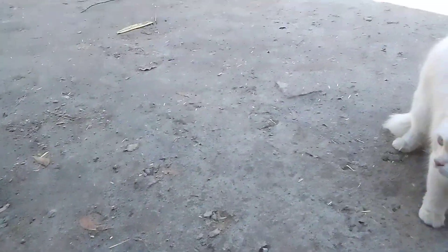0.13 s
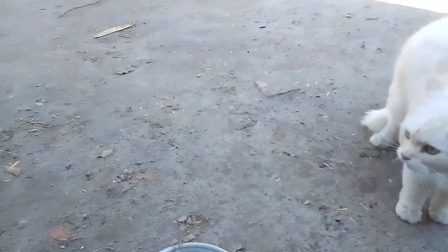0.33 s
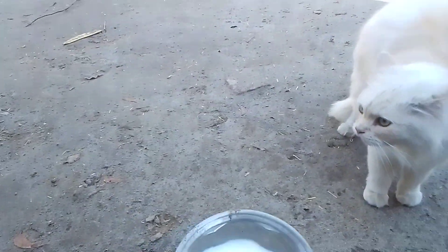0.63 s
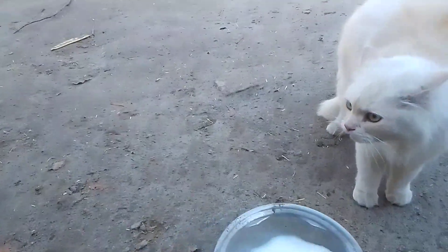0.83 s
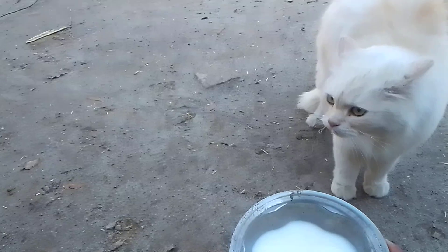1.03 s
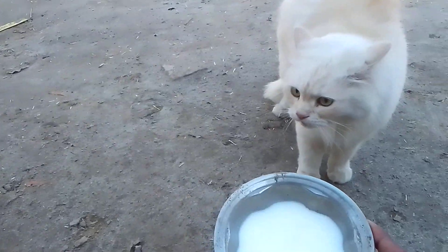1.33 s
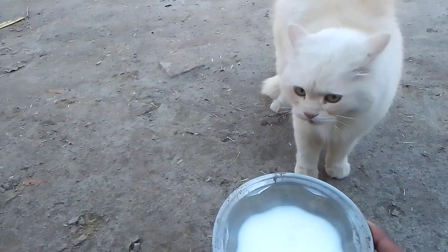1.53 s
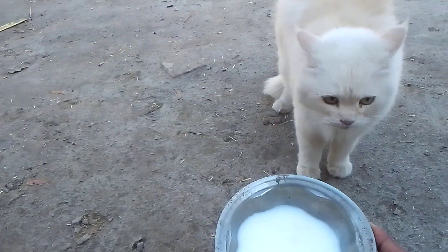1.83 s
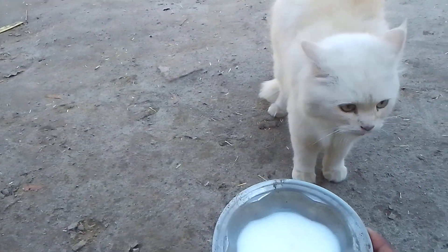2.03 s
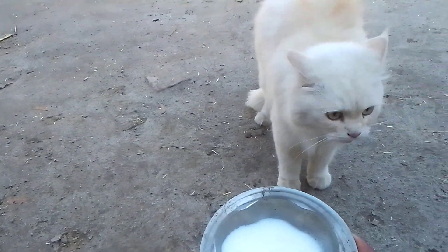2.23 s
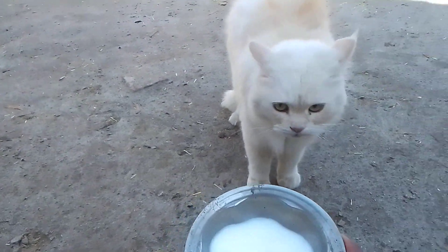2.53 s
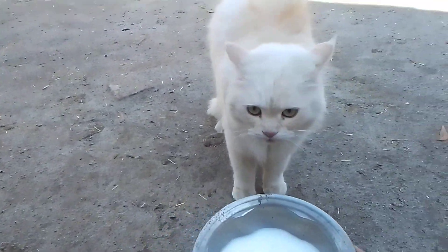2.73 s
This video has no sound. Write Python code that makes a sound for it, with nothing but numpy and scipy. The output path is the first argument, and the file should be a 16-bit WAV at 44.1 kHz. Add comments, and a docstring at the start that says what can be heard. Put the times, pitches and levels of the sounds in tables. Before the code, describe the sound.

Close, nearly dry mono pickup in a quiet yard: one long cat yowl rises from a hum to a gravelly cry, tightens, wavers and falls away, with faint ticks and a small rasp near the end.

```python
"""Open ground, quiet outdoor air: a cat close by gives one long yowl, from closed-mouth hum to wide cry
whose vocal folds beat strong and weak in turn, then narrowing, quavering and sinking to a nasal moan.
The voice is a sum of harmonics and half-harmonics shaped by a changing throat, plus pulsed noise.
Harmonic sums also make a few faint second tones and a short rasp that breaks into noise; ticks are
decaying bands of noise. A weak, short scatter follows the near sounds; shaped noise is the air."""
import sys
import numpy as np
from scipy import signal
from scipy.fft import rfft, irfft, next_fast_len
from scipy.io import wavfile
from scipy.ndimage import map_coordinates

SR = 44100
rng = np.random.default_rng(int(sys.argv[2]) if len(sys.argv) > 2 else 0)


def put_to_file(sound):
    """Save the sound as 16-bit audio at rate SR, in the file named by the first command-line argument."""
    columns = np.atleast_2d(sound).T  # one column per channel
    safe = np.clip(columns, -1, 1)
    whole_steps = np.round(safe * 32767)
    wavfile.write(sys.argv[1], SR, whole_steps.astype(np.int16))


N = 127890

# Background air spectrum: (frequency [Hz], relative level [dB])
AIR_SPECTRUM = [(25, -6), (60, -23.5), (150, -34), (200, -15), (250, -39), (330, -4.5), (450, 7), (600, -9),
                (1700, -10.5), (3000, -13), (4600, -13), (5500, -24), (15500, -29)]
# Background air: (time [s], level [dB])
AIR_LEVEL = [(0, -71), (.25, -70), (2.1, -68), (2.5, -71), (2.9, -66)]

# Mean beat rate of the vocal folds: (time [s], pitch [Hz])
PITCH = [(0.0, 395.4), (0.28, 373.3), (0.35, 374), (0.39, 380), (0.41, 388), (0.428, 382), (0.45, 392),
         (0.47, 385), (0.5, 396), (0.53, 399.2), (0.64, 406), (0.84, 432.3), (1.07, 431.5), (1.12, 442.3),
         (1.45, 444.6), (1.68, 454.5), (1.72, 463.2), (1.76, 453.6), (1.92, 465.8), (2.04, 454.0),
         (2.06, 439), (2.085, 462.0), (2.11, 435), (2.15, 451), (2.18, 422.3), (2.197, 452), (2.24, 450),
         (2.255, 437), (2.28, 438), (2.295, 409.3), (2.385, 413.1), (2.41, 391.1), (2.48, 396), (2.53, 383),
         (2.62, 346.4), (2.71, 331.6), (2.76, 337.7), (2.845, 316.1), (2.86, 335.2), (2.9, 329.8)]
# Voice level before shimmer: (time [s], level [dB])
EFFORT = [(0, -58.5), (.19, -56.5), (.26, -50.5), (.3, -44), (.44, -44), (.47, -42.5), (.5, -44.5),
          (.55, -43.5), (.62, -42.5), (.7, -39.5), (.86, -40.5), (1.08, -42.5), (1.44, -42), (1.63, -40.3),
          (1.85, -43), (2.1, -49.5), (2.26, -50.5), (2.33, -53), (2.43, -53), (2.52, -55), (2.9, -57.5)]
# Mouth: (time [s], shape [0 closed, 1 opening, 2 wide, 3 narrowed, 4 pursed, 5 nasal])
MOUTH = [(0, 0), (.17, .05), (.24, .55), (.29, 1), (.38, 1.05), (.55, 1.8), (.68, 2), (.9, 2), (1.04, 2.45),
         (1.14, 2.9), (1.4, 3), (1.8, 3), (2.07, 4), (2.27, 4.1), (2.3, 4.7), (2.45, 4.9), (2.6, 5),
         (2.9, 5)]
# Half-harmonics from alternating strong and weak beats: (time [s], gain [dB])
DOUBLING = [(0, -54), (.3, -22.5), (.38, -12.5), (.44, -10.5), (.62, -0.5), (.88, -6), (1.1, 0.5),
            (1.33, -4.5), (1.47, -11), (1.53, -7.5), (1.58, -1), (1.64, -8), (1.72, -28.5), (1.86, -28),
            (1.93, -28), (2.2, -29), (2.32, -29), (2.9, -25.5)]
# Fundamental against the throat's own response: (time [s], gain [dB])
CHEST = [(0, 1), (.2, -1.5), (.4, -1.5), (.5, 1.5), (1.1, 4), (1.7, -6), (2.1, 8), (2.4, 2), (2.75, -1)]
# Scale of the pitch unsteadiness: (time [s], scale [%])
QUAVER = [(0, .4), (.33, .2), (.44, .8), (.65, .38), (1.5, .45), (1.85, .55), (2.24, 1.25), (2.32, .5),
          (2.9, .8)]
# Hoarse noise against the voice: (time [s], level [dB])
HOARSE = [(.3, -28), (.43, -18), (.68, -23), (1.4, -30), (1.6, -24), (1.8, -31), (2.2, -27), (2.35, -32)]
# Throat response for each mouth shape: (frequency [Hz], gain [dB])
CLOSED = [(200, -35.5), (390, 1.5), (780, -5), (1170, -14), (1950, -31.5), (2600, -57), (3100, -20.5),
          (3950, -21), (4300, -24), (5000, -58), (6100, -36.5), (7500, -37), (15000, -51)]
OPENING = [(200, -46), (375, -15.5), (560, -21), (730, 8), (790, -5.5), (1130, -4), (1500, -18.5),
           (1880, -22), (2000, -26), (2130, -4), (2250, -2), (2420, -32.5), (2630, -20.5), (3000, -30),
           (3350, -44), (3750, -26.5), (4120, -25.5), (5600, -57), (6000, -28), (6350, -32), (6800, -58),
           (7500, -33), (8800, -69)]
WIDE = [(200, -45), (400, -17), (620, -27), (790, 0), (870, 0), (1050, -8), (1260, -5.5), (1480, -28),
        (1660, -24.5), (1900, -24), (2130, -23), (2330, -11), (2400, -9), (2490, -13), (2700, -23),
        (3400, -26), (3750, -42), (4100, -41), (5000, -51), (5450, -47), (6450, -46), (6900, -58),
        (7600, -46), (8800, -60), (15000, -54)]
NARROW = [(200, -61), (440, -16), (660, -27.5), (860, 2.5), (940, 2), (1110, -16), (1340, -20.5),
          (1560, -29), (1800, -26), (2000, -22.5), (2250, -13.5), (2460, -22.5), (2900, -31), (3170, -23.5),
          (3350, -23.5), (3600, -44), (4150, -33), (4600, -63), (5600, -56), (6100, -44.5), (7150, -57),
          (8800, -70.5), (15000, -56.5)]
PURSED = [(200, -21), (440, -14.5), (660, -7.5), (840, 0.5), (930, 7.5), (1330, -14.5), (1780, -20),
          (2130, -19), (2300, -8.5), (2700, -32), (3150, -37), (4100, -40), (4700, -47.5), (15000, -64)]
NASAL = [(200, -20), (300, 0), (960, 0), (1220, -2), (1380, -19), (1650, -26), (2020, -8), (2400, -33),
         (2850, -22), (3150, -30), (4150, -33), (4520, -21), (4900, -24), (5400, -46), (6400, -38),
         (7500, -50), (15000, -56)]
# Moving upper resonance of the mouth: (time [s], centre [Hz], height [dB])
RING = [(.38, 4050, 0), (.515, 4110, 24), (.58, 4050, 16), (.69, 4040, 30), (.77, 4100, 11),
        (.835, 4110, 19), (.865, 4300, 8), (.885, 4540, 21), (.95, 4540, 21), (1.03, 4470, 12),
        (1.14, 4240, 17), (1.44, 4200, 23), (1.6, 4130, 14), (2.03, 4130, 14), (2.3, 4100, 0)]
# Middle resonance of the mouth, the twang of the cry: (time [s], height [dB])
TWANG = [(.26, 2.5), (.36, -0.5), (.5, -0.5), (.88, 4), (1.1, -1), (1.67, -3), (1.715, 6.5), (1.75, -10),
         (1.86, 2.5), (2.4, -2.5)]
# High, thin resonance of the mouth: (time [s], height [dB])
WHISTLE = [(.3, 3), (.5, 8.5), (.6, 12.5), (.66, 20.5), (.7, 15), (.78, 23.5), (.86, -1.5), (1.05, -7.5),
           (1.15, 9), (1.45, 27), (1.58, 21.5), (1.9, 20.5), (2.05, 30), (2.2, 2)]

# Ticks: (time [s], starting level before the final halving [dB], centre [Hz])
TICKS = [(.452, -57, 4300), (1.308, -64, 6500), (2.608, -58, 2800), (2.613, -60, 4000)]
# Second tones beside the moan:
# (time [s], length [s], pitch [Hz], glide [Hz/s], level [dB], added level of second harmonic [dB])
SECOND_TONES = [(2.11, .11, 372, -380, -64.5, 10), (2.454, .13, 359.7, -330, -64.5, 8),
                (2.777, .16, 405.3, -2, -63, -12)]
# Throat of the second tones: (frequency [Hz], gain [dB])
SECOND_TONE_BODY = [(400, -0.5), (800, 0.5), (1200, -33), (2000, -20), (2420, -18), (2830, -13)]
# Resonances of the rasp at its starting pitch: (frequency [Hz], gain [dB])
RASP_BODY = [(500, -20), (1100, -31), (1500, 0), (1750, -4), (2040, 9), (2300, -6), (2500, 4.5),
             (2850, -26), (4000, -34), (4500, -20), (5000, -45)]
# Power of the rasp that breaks into coarse noise: (time [s], share [0 to 1])
RASP_BREAK = [(2.6, .15), (2.68, .2), (2.73, .7), (2.77, .7), (2.82, .3)]
# Coarse part of the rasp: (frequency [Hz], relative level [dB per Hz])
RASP_GRIT = [(1000, -35), (1500, -20), (1700, 3), (1950, 8.5), (2350, -3), (2700, -42), (5000, -36)]

RING_WIDTH_HZ = 175
TWANG_HZ, TWANG_WIDTH_HZ = 2330, 150
WHISTLE_HZ, WHISTLE_WIDTH_HZ = 6040, 130
JITTER_PER_S = 75
CYCLE_JITTER, CYCLE_JITTER_PER_S = 0.62, 260  # share of the quaver, changes a second
SHIMMER_DB, SHIMMER_PER_S = .6, 130
DRIFT_DB, DRIFT_PER_S = 1.02, 9.204  # slow drift of each upper partial
FLUTTER_DB, FLUTTER_PER_S = 2.1, 80  # fast flutter, dB for each % of quaver
SMEAR_RAD, SMEAR_PER_S = .95, 6  # upper partials wander out of step, which blurs each pulse
HOARSE_COLOUR = .62  # share of the throat's dB shape that the noise takes on
YARD_T60_S, YARD_DB = .3, -19
TICK_T60_S, TICK_WIDTH_SHARE = .018, .22
SECOND_TONE_FADE_S = 0.067
RASP_S, RASP_ATTACK_S, RASP_HOLD_S, RASP_RELEASE_S = 2.606, .006, .12, .14
RASP_HZ, RASP_SAG_HZ_PER_S = 512, 210
RASP_DB, RASP_RATTLE_DB, RASP_RATTLE_PER_S = -62, 2.3, 190
TOP_HZ = 15800


def amp(db):
    """Decibel law: level to amplitude ratio."""
    return 10 ** (np.asarray(db) / 20)


def unit(x):
    """Power normalisation: scale to rms 1."""
    return x / np.sqrt(np.mean(x ** 2) + 1e-20)


def along(points, hz):
    """Logarithmic frequency scale: interpolate (Hz, value) points."""
    f, v = np.transpose(points)
    return np.interp(np.log(hz + 1), np.log(f + 1), v)


def curve(rows):
    """Linear interpolation in time: one value per sample from (s, value) rows."""
    return np.interp(np.arange(N) / SR, *np.transpose(rows))


def wobble(rate):
    """Band-limited random fluctuation: a smooth curve through rate random knots a second."""
    coarse = np.arange(0, N + 16, 16)
    knots = rng.standard_normal(4096)
    values = map_coordinates(knots, [coarse * rate / SR], mode="wrap")
    return np.interp(np.arange(N), coarse, values)


def filtered(x, response):
    """Linear filtering: multiply the spectrum by a response of frequency."""
    m = next_fast_len(N + SR // 4)
    return irfft(rfft(x, m) * response(np.fft.rfftfreq(m, 1 / SR)), m)[:N]


def noise(spectrum):
    """Spectral shaping: coloured random noise of rms 1."""
    return unit(filtered(rng.standard_normal(N), lambda hz: amp(along(spectrum, hz))))


def bell(hz, centre_hz, width_hz):
    """Lorentzian resonance: a peak of 1 at its centre."""
    return 1 / (1 + ((hz - centre_hz) / width_hz) ** 2)


def causal(spectrum, size=4096):
    """Minimum phase: a ringing body's log gain and phase, on an even grid up to SR / 2."""
    log_gain = np.log(amp(along(spectrum, np.fft.rfftfreq(size, 1 / SR))))
    cepstrum = irfft(log_gain)
    # fold the cepstrum onto positive time
    cepstrum[1:size // 2] *= 2
    cepstrum[size // 2 + 1:] = 0
    return rfft(cepstrum)


def outdoor_air():
    """Broadband noise: a steady spectrum under a slowly changing level."""
    return amp(curve(AIR_LEVEL)) * noise(AIR_SPECTRUM)


def hoarseness(shapes, mouth, phase):
    """Turbulence modulated by the folds: throat-coloured noise that swells once a cycle."""
    hiss = np.zeros(N)
    for i, shape in enumerate(shapes):
        share = np.clip(1 - abs(mouth - i), 0, 1)
        hiss += share * noise([(hz, db * HOARSE_COLOUR) for hz, db in shape])
    pulsed = hiss * (1 + 0.33 * np.cos(phase))
    # little noise lies below the fundamental
    return unit(filtered(pulsed, lambda hz: amp(along([(240, -43), (330, 7)], hz))))


def yowl(count=38):
    """Source-filter principle with period doubling: fold (half-)harmonics pass a changing throat."""
    shapes = [CLOSED, OPENING, WIDE, NARROW, PURSED, NASAL]
    throat = np.array([causal(shape) for shape in shapes])
    mouth = np.clip(curve(MOUTH), 0, len(shapes) - 1)
    doubling = amp(curve(DOUBLING))
    quaver = curve(QUAVER)
    unsteadiness = wobble(JITTER_PER_S) + CYCLE_JITTER * wobble(CYCLE_JITTER_PER_S)
    pitch = curve(PITCH) * (1 + quaver / 100 * unsteadiness)
    phase = 2 * np.pi * np.cumsum(pitch) / SR
    ring_hz = curve([(s, hz) for s, hz, db in RING])
    ring_db = curve([(s, db) for s, hz, db in RING])
    twang_db, whistle_db = curve(TWANG), curve(WHISTLE)
    voice, power = np.zeros(N), np.zeros(N)
    for k in np.arange(1, count + 1) / 2:
        hz = k * pitch
        # blend neighbouring mouth shapes at this partial's frequency
        at = [mouth, hz / (SR / 2) * (throat.shape[1] - 1)]
        gain = np.exp(map_coordinates(throat.real, at, order=1))
        lag = map_coordinates(throat.imag, at, order=1)
        peaks_db = ring_db * bell(hz, ring_hz, RING_WIDTH_HZ)
        peaks_db += whistle_db * bell(hz, WHISTLE_HZ, WHISTLE_WIDTH_HZ)
        peaks_db += twang_db * bell(hz, TWANG_HZ, TWANG_WIDTH_HZ)
        gain *= amp(peaks_db)
        if k % 1:  # halfway between harmonics
            gain *= doubling
        if k == 1:
            gain *= amp(curve(CHEST))
        if k > 2:
            drift_db = DRIFT_DB * wobble(DRIFT_PER_S)
            gain *= amp(drift_db + FLUTTER_DB * quaver * wobble(FLUTTER_PER_S))
        if k > 3:
            lag += SMEAR_RAD * wobble(SMEAR_PER_S)
        voice += gain * np.cos(k * phase + lag)
        power += gain ** 2 / 2
    hiss = hoarseness(shapes, mouth, phase)
    level = amp(curve(EFFORT) + SHIMMER_DB * wobble(SHIMMER_PER_S))
    # divide by the partials' power so that the level curve alone sets their strength
    return level * (voice / np.sqrt(power) + amp(curve(HOARSE)) * hiss)


def yard(x):
    """Diffuse reverberation: a weak, short exponential scatter from the ground and walls."""
    t = np.arange(SR // 2) / SR
    tail = rng.standard_normal(len(t)) * amp(-60 * t / YARD_T60_S)
    return amp(YARD_DB) * signal.fftconvolve(x, tail / np.linalg.norm(tail))[:N]


def ticks():
    """Damped impulsive excitation: faint dry bands of noise, each at its own centre, die at once."""
    t, out = np.arange(N) / SR, np.zeros(N)
    for s, db, centre_hz in TICKS:
        width_hz = TICK_WIDTH_SHARE * centre_hz
        crack = unit(filtered(rng.standard_normal(N), lambda hz: bell(hz, centre_hz, width_hz)))
        out += (t >= s) * amp(db - 60 * abs(t - s) / TICK_T60_S) * crack
    return out / 2


def second_tones(count=7):
    """Superposition: short gliding harmonic tones sound beside the sinking moan."""
    out = np.zeros(N)
    for s, length, hz, glide, db, octave_db in SECOND_TONES:
        t = np.clip(np.arange(N) / SR - s, 0, length)
        pitch = (hz + glide * t) * (1 + 0.00423 * wobble(JITTER_PER_S))
        phase = 2 * np.pi * np.cumsum(pitch) / SR
        tone = np.zeros(N)
        for k in range(1, count + 1):
            partial_db = along(SECOND_TONE_BODY, k * hz) + octave_db * (k == 2)
            tone += amp(partial_db) * np.sin(k * phase)
        fade = np.clip(np.minimum(t, length - t) / SECOND_TONE_FADE_S, 0, 1)
        out += amp(db) * fade * unit(tone)
    return out


def rasp(count=9, rough=0.0119):
    """Irregular oscillation: a sagging, rattling harmonic tone partly gives way to coarse noise."""
    t = np.clip(np.arange(N) / SR - RASP_S, 0, None)
    pitch = (RASP_HZ - RASP_SAG_HZ_PER_S * t) * (1 + rough * wobble(350))
    phase = 2 * np.pi * np.cumsum(pitch) / SR
    partials = [amp(along(RASP_BODY, k * RASP_HZ)) * np.sin(k * phase) for k in range(1, count + 1)]
    tone = unit(sum(partials))
    broken = curve(RASP_BREAK)
    corners = np.cumsum([0, RASP_ATTACK_S, RASP_HOLD_S, RASP_RELEASE_S])
    envelope = np.interp(t, corners, [0, 1, 1, 0])
    level = amp(RASP_DB + RASP_RATTLE_DB * wobble(RASP_RATTLE_PER_S))
    return level * envelope * (np.sqrt(1 - broken) * tone + np.sqrt(broken) * noise(RASP_GRIT))


def scene():
    """Superposition: the near sounds and their scatter add to the outdoor air, in one channel."""
    near = yowl() + second_tones() + rasp() + ticks()
    return (near + yard(near) + outdoor_air())[None]


def record(dry):
    """Band limitation: an ideal low-pass keeps nothing at or above its limit."""
    return np.array([filtered(channel, lambda hz: hz < TOP_HZ) for channel in dry])


dry = scene()
out = record(dry)
put_to_file(out)
```